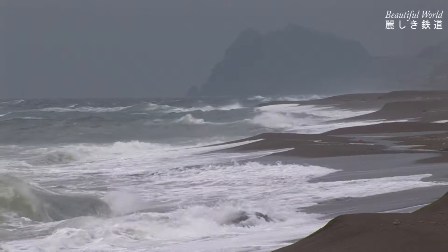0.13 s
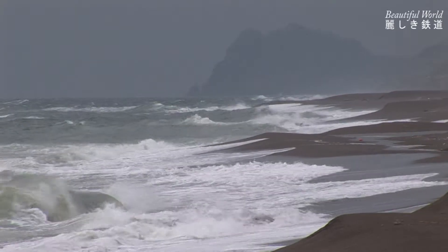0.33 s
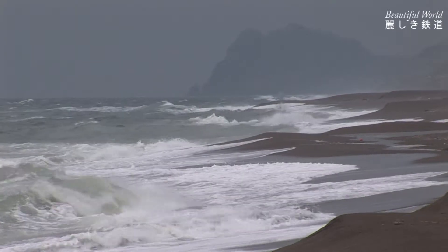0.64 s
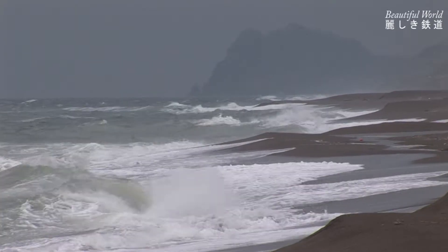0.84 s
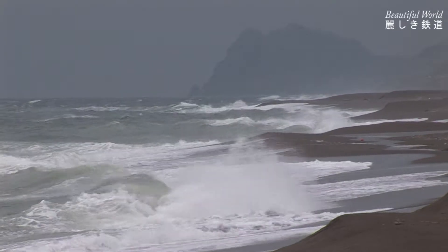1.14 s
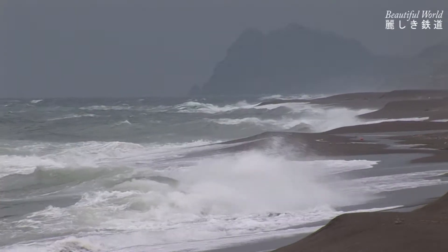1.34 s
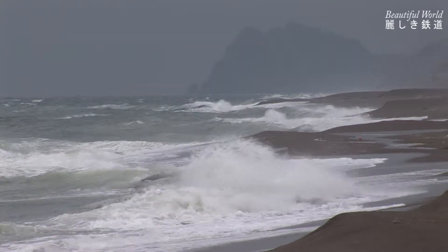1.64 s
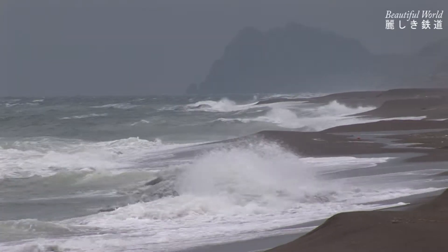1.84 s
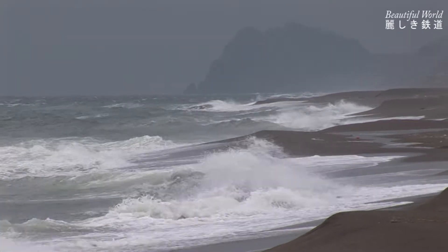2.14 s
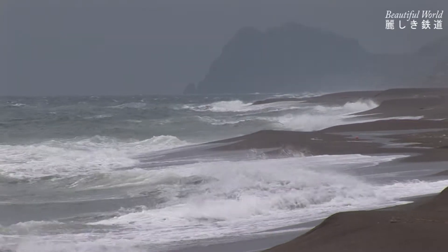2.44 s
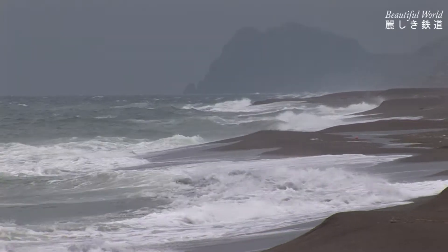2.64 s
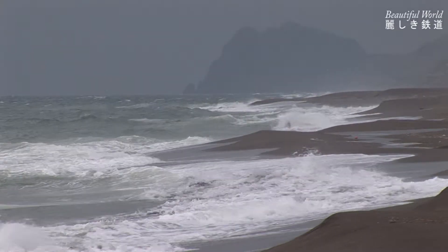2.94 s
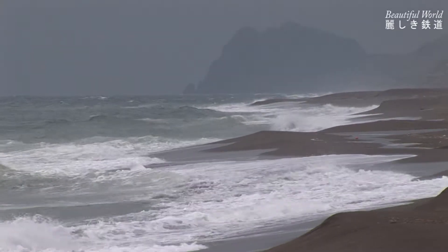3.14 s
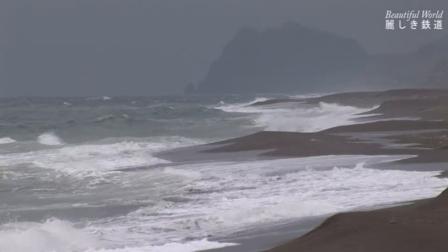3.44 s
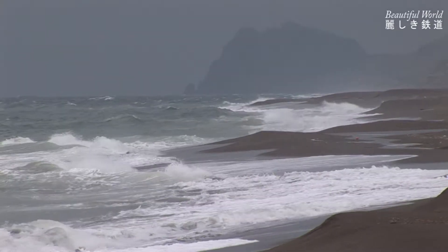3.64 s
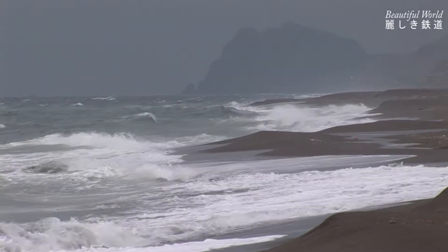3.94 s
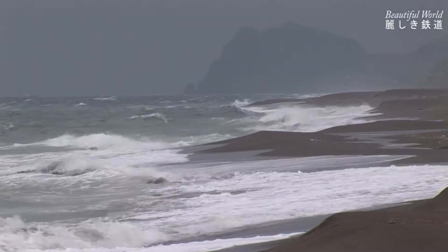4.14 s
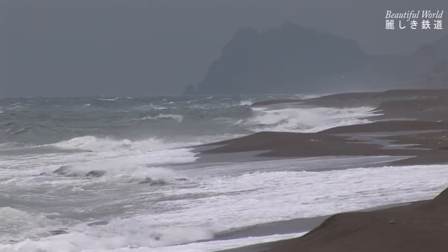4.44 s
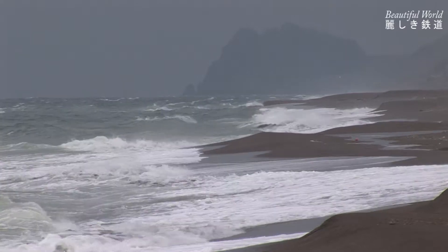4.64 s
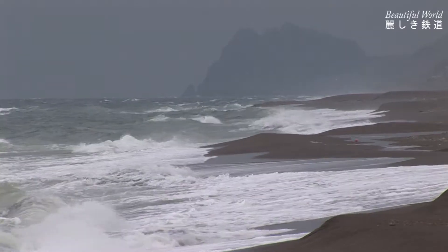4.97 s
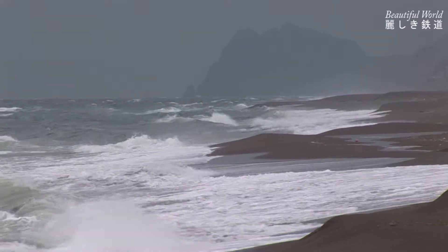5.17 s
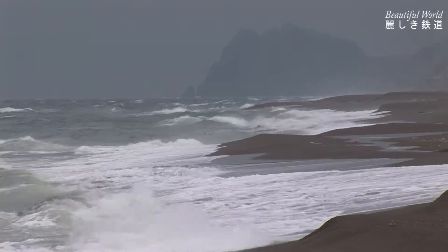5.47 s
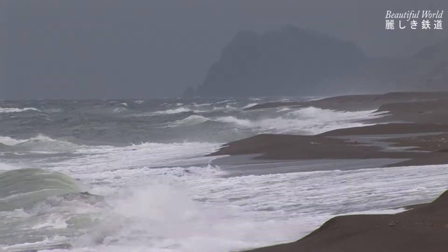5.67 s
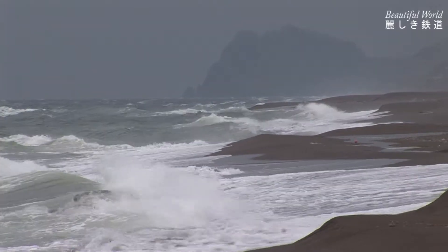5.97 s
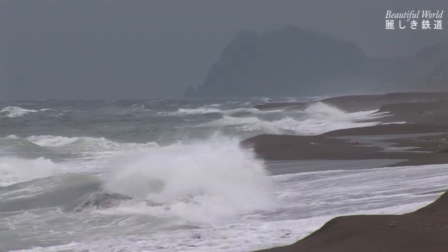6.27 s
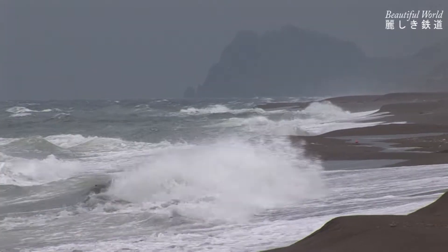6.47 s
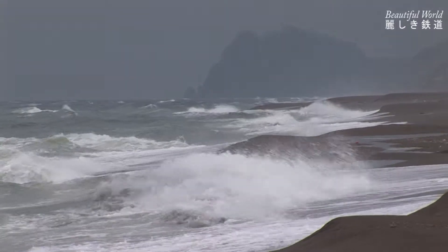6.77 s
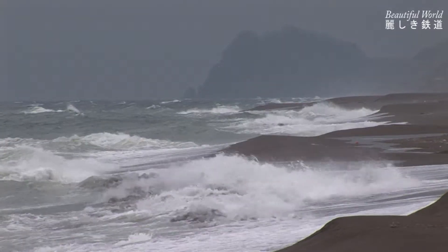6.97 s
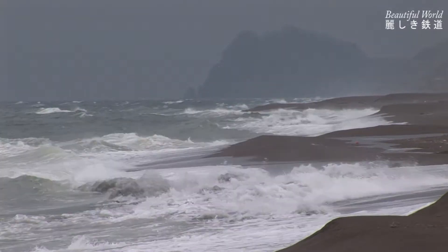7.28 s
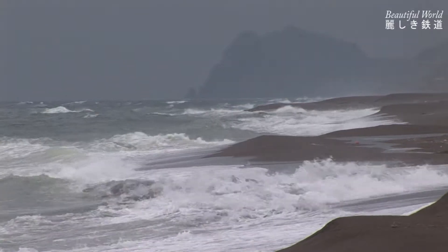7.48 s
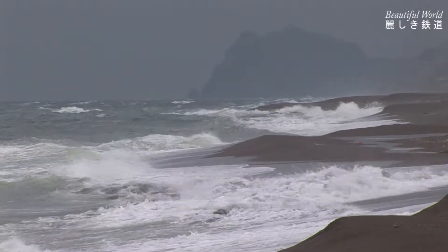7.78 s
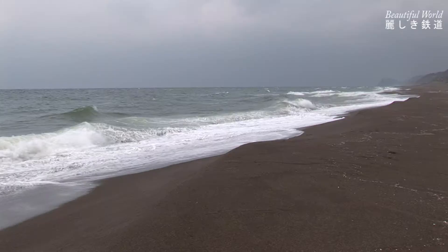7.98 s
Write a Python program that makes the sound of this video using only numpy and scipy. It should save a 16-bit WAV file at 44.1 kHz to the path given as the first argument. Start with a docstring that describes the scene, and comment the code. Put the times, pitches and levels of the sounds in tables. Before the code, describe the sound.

A rough sea on an open sandy beach. A large breaker crests almost at once with a broad roar, low pouring water and hissing spray, then smaller waves follow. Another big one builds and crashes after six seconds, fading slowly. Distant surf never stops. Wind thumps and flutters close on the small stereo microphone, strongest in the first three seconds; bright sea hiss leans left.

```python
"""Breakers of a rough sea plunge on a sandy beach: white water roars, spray and foam hiss, over distant surf.
Water is coloured noise and random clicks under a build-and-fade envelope for each breaker, with splashes
and dips in level. Swash seethes on the sand. Wind buffets, thumps and flutters on the two ports of a small
stereo microphone: lumpy noise and damped swings. It faces the shore with the sea on its left."""
import sys
import numpy as np
from scipy.fft import rfft, irfft, next_fast_len
from scipy.io import wavfile
from scipy.ndimage import uniform_filter1d

SR = 44100
rng = np.random.default_rng(int(sys.argv[2]) if len(sys.argv) > 2 else 0)


def transcribe(u):
    """Save the signal u as a 16-bit wav file named by the first command-line argument.

    u: samples, shape (n,) or (channels, n), limited to [-1, 1]; the rate is SR.
    q: integer samples, one column per channel.
    """
    v = np.clip(np.atleast_2d(u).T, -1, 1)
    q = np.round(v * 32767).astype(np.int16)
    wavfile.write(sys.argv[1], SR, q)


N = 357642
TIME = np.arange(N) / SR
SIZE = next_fast_len(N)
HZ = np.maximum(np.arange(SIZE // 2 + 1) * SR / SIZE, 1)


def from_db(db):
    """Decibels to amplitude gain."""
    return 10 ** (np.asarray(db) / 20)


def rms_one(x):
    """Scale to an rms of 1."""
    return x / np.sqrt(np.mean(x ** 2) + 1e-20)


def in_time(rows):
    """Interpolate each column of a curve at every sample."""
    s, *columns = np.transpose(rows)
    return [np.interp(TIME, s, column) for column in columns]


def in_hz(rows):
    """Interpolate each column of a spectrum over log frequency."""
    hz, *columns = np.transpose(rows)
    return [np.interp(np.log(HZ), np.log(hz), column) for column in columns]


def filtered(x, response):
    """Apply a frequency response."""
    return irfft(rfft(x, SIZE) * response, SIZE)[..., :N]


def drift(rate_hz):
    """Low-passed noise, -6 dB at rate_hz, with an rms of 1."""
    return rms_one(filtered(rng.standard_normal(N), 1 / (1 + (HZ / rate_hz) ** 2)))


def swells(rows):
    """Sum of brief Gaussian level changes, in dB."""
    return sum(db * np.exp(-0.5 * ((TIME - s) / sigma_s) ** 2) for s, sigma_s, db in rows)


def summed(levels_db, envelopes, background_db):
    """Gain of overlapping events over a background level, steady or changing; powers add."""
    event_power = from_db(levels_db) ** 2 @ envelopes ** 2
    return np.sqrt(event_power + from_db(background_db) ** 2)


def bursts(per_s, spread_db):
    """Bubbles and drops: random clicks of very uneven size, in two unrelated streams."""
    sizes = from_db(spread_db * np.minimum(rng.exponential(1, (2, N)), 5))
    present = rng.random((2, N)) < per_s / SR
    return rms_one(rng.standard_normal((2, N)) * sizes * present)


def churn(pair, depth_db, rate_hz):
    """Clouds of bubbles of each size swell and fade independently, octave by octave."""
    octave = np.clip(np.log2(HZ / 250), 0, 6)
    out = np.zeros((2, N))
    for k in range(7):
        band = np.maximum(1 - abs(octave - k), 0)
        out += filtered(pair, band) * from_db(depth_db * drift(rate_hz))
    return out


def at_ports(pair, spectrum, shade_db, lead_rad, coherence):
    """Colour two unrelated signals, mix them into left and right; mid (mean of both) has an rms of 1."""
    colour = from_db(in_hz(spectrum)[0])
    shared, own = rfft(pair, SIZE) * colour
    coherence = np.clip(coherence, 0, 0.99)
    mixed = coherence * shared + np.sqrt(1 - coherence ** 2) * own
    right = from_db(shade_db) * np.exp(-1j * lead_rad) * mixed
    out = irfft(np.array([shared, right]), SIZE)[:, :N]
    return out / np.std(out.mean(axis=0))


# peaks and notches in the sea's tone at each port: centre_hz, width_hz (full, at half the dB), gain_db
LEFT_PORT = [(2520, 430, -3), (4465, 480, -4), (5240, 330, -6.5), (5750, 530, 3), (6930, 1750, -7.5),
             (7000, 890, -7.5), (8700, 500, 1.5), (9150, 500, -2.5)]
RIGHT_PORT = [(2380, 1540, -4.7), (3180, 630, 4.5), (4620, 400, -2.5), (5080, 400, -1), (7100, 2450, -7.5),
              (6960, 910, -9), (9120, 600, -1.5), (13900, 800, 3.5), (14750, 750, -5)]


def port_tone():
    """Peaks and notches in the sea's tone at each port, deepest near 7 kHz."""
    def port_db(port):
        return sum(db / (1 + (2 * (HZ - hz) / width_hz) ** 4) for hz, width_hz, db in port)
    return from_db([port_db(LEFT_PORT), port_db(RIGHT_PORT)])


# sea at the ports, aslant = 1: freq_hz, right_minus_left_db
SEA_SHADE = [(100, -0.5), (300, 1), (500, 5), (800, -5.5), (1300, -8.5), (1800, -2.5), (2450, -4),
             (3100, -4), (4000, -12), (6000, -4.5), (8000, -1.5), (10000, -7.5), (12500, -15),
             (15000, -11.5)]
# freq_hz, left_lead_rad
SEA_LEAD = [(100, .2), (600, 1.0), (900, .8), (1500, -.2), (2900, -.4), (3800, .7), (4500, 1.9),
            (5000, 1.4), (5600, 2.9), (9000, 3.4), (9800, 5.2), (12000, 6.2), (13200, 5.3), (15000, 7.0)]
# freq_hz, coherence (0..1)
SEA_COHERENCE = [(100, .82), (800, .93), (1250, .88), (1800, .94), (2100, .85), (2450, .42), (2800, .72),
                 (3250, .93), (3600, .84), (4000, .68), (4300, .74), (4650, .42), (5000, .8), (6400, .79),
                 (8000, .64), (10500, .72), (12500, .45), (15000, .25)]


def from_sea(pair, spectrum, aslant):
    """Sea sound differs in level and phase at the ports; aslant 0 = straight ahead, 1 = well to the left."""
    shade_db, lead_rad = in_hz(SEA_SHADE)[0], in_hz(SEA_LEAD)[0]
    coherence = in_hz(SEA_COHERENCE)[0] ** aslant
    return filtered(at_ports(pair, spectrum, aslant * shade_db, aslant * lead_rad, coherence), port_tone())


# distant surf: freq_hz, density_db_per_hz (relative)
FAR_SURF = [(30, -2), (70, -12), (160, -10.5), (270, 0), (400, -6), (600, -12), (820, -9), (1030, 0),
            (1300, -5), (2000, -7.5), (3500, -12.5), (5300, -16), (7500, -36), (15000, -46)]
FAR_SURF_DB = -46


def distant_surf():
    """Steady coloured noise: the distant roar."""
    return from_db(FAR_SURF_DB) * from_sea(rng.standard_normal((2, N)), FAR_SURF, aslant=0.58)


# wind at the ports: freq_hz, right_minus_left_db, left_lead_rad, coherence (0..1)
WIND_PORTS = [(40, -2.5, 0.1, 0.96), (148, 0.6, 0.33, 0.82), (340, 2, 1.02, 0.93), (543, -4, 1.6, 0.98),
              (855, -9.5, 0.86, 0.62), (1340, -1, -0.5, 0.94), (2840, 0, -0.7, 1), (4600, 11.5, 1, 0.86),
              (5930, 0, 4, 0.8), (6800, 4, -6, 1), (12000, 1, 9, .6)]


def eddies(spectrum, lump_db, rate_hz, span_s):
    """Lumpy pressure of passing eddies, levelled over span_s."""
    lumpy = rng.standard_normal((2, N)) * from_db(lump_db * drift(rate_hz))
    swirl = at_ports(lumpy, spectrum, *in_hz(WIND_PORTS))
    power = uniform_filter1d(swirl.mean(axis=0) ** 2, int(span_s * SR))
    return swirl / np.sqrt(power + 1e-6)


# hard eddies on the grille: start_s, pitch_hz, swing_db (before damping), rasp_db
THUMPS = [(0.132, 154, -24, -36.5), (0.172, 210, -24, -38), (0.202, 170, -23.5, -46), (0.48, 170, -19, -50),
          (0.556, 169, -25, -31), (0.567, 157, -23, -38), (0.599, 175, -19, -33.5), (0.817, 190, -27, -48),
          (0.924, 183, -28, -47), (1.064, 133, -22, -50), (1.277, 162, -24, -48), (1.457, 205, -25, -52),
          (1.48, 210, -26, -40), (1.514, 175, -25, -32.5), (1.69, 175, -25, -51), (1.731, 70, -31, -40),
          (1.823, 168, -23, -48), (1.878, 180, -28, -37), (2.336, 180, -20.5, -39),
          (2.376, 240, -20.5, -38), (2.426, 167, -24, -36), (2.47, 192, -20, -43), (2.576, 75, -35, -47),
          (2.617, 185, -18, -49), (2.717, 159, -25, -41), (2.767, 158, -18.5, -37.5),
          (2.803, 164, -23, -34), (2.828, 169, -29, -40), (2.858, 192, -22, -40), (2.875, 197, -22, -35),
          (2.969, 155, -26, -48), (3.008, 119, -31, -55), (3.216, 143, -26.5, -52),
          (3.271, 160, -24.5, -37), (3.361, 148, -28, -33), (3.404, 143, -31, -48), (3.667, 140, -28, -51),
          (3.875, 174, -28, -41), (3.929, 140, -25, -41), (4.333, 113, -31, -44), (4.472, 215, -23, -39),
          (4.537, 237, -22, -39), (4.572, 245, -27, -35), (4.596, 170, -23, -43), (4.624, 131, -32, -49),
          (4.981, 149, -32, -38), (5.33, 220, -31, -34.5), (5.356, 126, -27.5, -54.5),
          (5.401, 144, -23, -42), (6.008, 127, -32, -48), (6.143, 260, -25, -43), (6.328, 65, -28, -50),
          (6.341, 156, -26, -45), (6.381, 135, -24.5, -36), (6.521, 181, -28, -41), (6.706, 120, -33, -46),
          (6.936, 183, -30, -40), (7.489, 160, -25, -55), (7.538, 165, -30, -43), (7.558, 142, -28, -40),
          (7.614, 251, -29, -34), (8.051, 60, -24, -50)]
# grille rasp: freq_hz, density_db_per_hz (relative)
RASP = [(200, 2.5), (450, 4), (1100, 3), (1700, -5.5), (2400, -10), (3200, -10.5), (4200, -27), (7000, -33)]
THUMP_DECAY_CYCLES, RASP_PEAK_S = 0.95, 0.0034   # decay to 1/e; time of the rasp's peak


def thumps():
    """Hard eddies: damped pressure swings, each with its own pitch and strength, and a brief grille rasp."""
    age_s = TIME[:SR // 20]
    swing, rasp = np.zeros((2, N))
    signs = rng.choice([-1, 1], len(THUMPS))
    for (s, hz, swing_db, rasp_db), sign in zip(THUMPS, signs):
        first = int(s * SR)
        span = slice(first, first + len(age_s))
        damping = np.exp(-age_s * hz / THUMP_DECAY_CYCLES)
        swing[span] += sign * from_db(swing_db) * np.sin(2 * np.pi * hz * age_s) * damping
        rasp[span] += from_db(rasp_db) * age_s / RASP_PEAK_S * np.exp(1 - age_s / RASP_PEAK_S)
    shade_db, lead_rad, coherence = in_hz(WIND_PORTS)
    right_swing = filtered(swing, from_db(shade_db) * np.exp(-1j * lead_rad))
    push = np.array([swing, right_swing])
    return push + rasp * at_ports(rng.standard_normal((2, N)), RASP, shade_db, lead_rad, coherence)


# gusts: start_s, length_s, buffet_db, rumble_db, flutter_db, left_minus_right_db (on top of WIND_PORTS)
GUSTS = [(0.172, 0.094, -42, -51, -40.5, 2), (0.46, 0.058, -33.5, -41, -45, 2),
         (0.53, 0.18, -35, -50, -45, 1), (0.782, 0.1, -37, -51, -41, 1.5), (0.901, 0.073, -36, -50, -39, 0),
         (1.03, 0.081, -36.5, -46, -51, 0), (1.45, 0.077, -34, -46, -46, 2.5),
         (1.562, 0.09, -38, -52, -45, 1.5), (1.666, 0.092, -33.5, -45, -49, 1.5),
         (1.758, 0.18, -35, -55, -50, 2), (2.33, 0.064, -34, -54, -39, 1.5),
         (2.404, 0.04, -31, -51, -34, -1), (2.446, 0.15, -35, -54, -41.5, 1),
         (2.598, 0.13, -34, -52, -39, 1), (2.741, 0.14, -38, -39, -42, 0), (2.904, 0.097, -40, -60, -47, 2),
         (3.226, 0.21, -41, -42.5, -48.5, 1.5), (3.345, 0.011, -31, -51, -40, -4),
         (3.661, 0.052, -40.5, -43, -46, 7), (3.85, 0.094, -41.5, -42.5, -50.5, 6.5),
         (4.332, 0.077, -43, -42, -46.5, 3), (4.47, 0.032, -37, -56, -49, -1),
         (4.503, 0.19, -44, -50, -50.5, 0.5), (4.533, 0.068, -36.5, -52, -44, 3),
         (4.726, 0.033, -38, -63, -44, 1), (4.972, 0.035, -35, -40, -47, 1),
         (5.074, 0.1, -45.5, -46, -64, 3), (5.32, 0.11, -36, -41, -50, 3), (5.89, 0.15, -45, -47, -64, 4),
         (6.24, 0.059, -41, -42, -52, 6), (6.326, 0.028, -37, -36, -40, 14),
         (6.465, 0.059, -43, -56, -47, 0), (6.922, 0.033, -40, -40, -52, -2),
         (7.423, 0.044, -39.5, -42, -45, 3.5), (7.486, 0.12, -38.5, -44, -44, 3),
         (7.594, 0.03, -39.5, -44, -34, 1), (7.86, 0.072, -45.5, -43, -46, 3),
         (7.951, 0.04, -33.5, -39, -39.5, 1), (8.036, 0.075, -37, -29, -42.5, -5)]
# wind between gusts: time_s, buffet_db, rumble_db
BREEZE = [(0, -43, -47), (0.7, -45, -47), (1.25, -39.5, -53), (1.8, -34.5, -47), (2.9, -44, -46),
          (3.1, -55, -57), (3.8, -47.5, -48.5), (4.1, -56.5, -62), (4.5, -47.5, -50), (5.6, -56, -54),
          (6.2, -45, -49), (6.8, -49, -54), (7.3, -52, -60), (7.8, -63, -54), (8.11, -55, -55.5)]
# wind spectra: freq_hz, density_db_per_hz (relative)
EDDIES = [(20, -28), (50, -22), (100, 1.5), (165, 0.5), (240, -1.5), (340, -6), (450, -14), (700, -18),
          (1200, -22), (4000, -51)]
RUMBLE = [(10, -28), (25, -14), (60, 7.5), (90, 5.5), (150, -13), (400, -66)]
FLUTTER = [(150, -7), (400, 3), (600, 5.5), (1000, 1.5), (1500, -3), (2200, -6), (3000, -8.5), (4000, -34),
           (6000, -49), (7200, -50), (12000, -46)]
BREEZE_SIDE_DB = 2   # left minus right, on top of WIND_PORTS
BREEZE_FLUTTER_DB = -6.5   # re breeze buffeting
GUST_RISE_S, GUST_FALL_S = 0.011, 0.017   # tanh time constants


def wind():
    """Gusts ride on a breeze; eddies push and thump on the ports, tear at the grille and flutter."""
    start_s, length_s, buffet_db, rumble_db, flutter_db, side_db = np.transpose(GUSTS)
    since_s = TIME - start_s[:, None]
    rise = np.tanh(since_s / GUST_RISE_S)
    fall = np.tanh((since_s - length_s[:, None]) / GUST_FALL_S)
    gusts = np.maximum(rise - fall, 0) / 2
    breeze_db, deep_db = in_time(BREEZE)
    swirl = eddies(EDDIES, lump_db=2.0, rate_hz=87, span_s=0.0364)
    deep_swirl = eddies(RUMBLE, lump_db=3.5, rate_hz=19, span_s=0.076)
    buffet = summed(buffet_db, gusts, breeze_db) * swirl
    rumble = summed(rumble_db, gusts, deep_db) * deep_swirl
    # flutter spurts with each eddy
    spurts = (np.tanh(abs(swirl[0])) + 0.76) * from_db(1.8 * drift(rate_hz=81))
    tearing = at_ports(rng.standard_normal((2, N)) * spurts, FLUTTER, *in_hz(WIND_PORTS))
    flutter = summed(flutter_db, gusts, breeze_db + BREEZE_FLUTTER_DB) * tearing
    lean_db = BREEZE_SIDE_DB + (side_db - BREEZE_SIDE_DB) @ gusts
    side_gain = from_db(np.array([lean_db, -lean_db]) / 2)
    return (buffet + rumble + thumps()) * side_gain + flutter


# water running up the sand: peak_s, sigma_s, level_db
SWASHES = [(1.7, 0.56, -53), (3.2, 0.4, -55), (6.95, 0.3, -54), (7.65, 0.3, -49)]
# swash: freq_hz, density_db_per_hz (relative)
SEETHING = [(1200, -26), (2100, -6), (2600, 4), (3000, 0), (3700, -13), (5000, -24), (9000, -45)]


def swash():
    """Small bubbles burst in the sheet of water that runs up the sand."""
    power = sum(from_db(db) ** 2 * np.exp(-((TIME - s) / sigma_s) ** 2) for s, sigma_s, db in SWASHES)
    return np.sqrt(power) * from_sea(bursts(per_s=9000, spread_db=0.5), SEETHING, aslant=0.58)


# breakers: peak_s, build_s, fade_s (before fade_share), water_db, plunge_db, spray_db, foam_db
BREAKERS = [(0.62, 3.4, 1.4, -42.5, -46, -42, -48), (1.62, 0.37, 0.3, -56, -48.5, -46, -53.5),
            (2.04, 0.15, 0.56, -65, -67, -65, -50.5), (2.55, 0.068, 0.31, -54.5, -57, -48, -74),
            (3.08, 0.1, 0.12, -58, -62, -67, -64), (4.62, 0.11, 1.4, -48, -60, -62, -72),
            (5.12, 1.2, 0.6, -54, -68, -50.5, -54), (5.55, 0.13, 0.84, -49.5, -47.5, -62, -58),
            (6.55, 1.36, 4, -43, -43.5, -43, -46.5), (7.25, 0.17, 0.3, -54, -49, -45.5, -62)]
WATER_DB, PLUNGE_DB, SPRAY_DB, FOAM_DB = np.transpose(BREAKERS)[3:]
CREST_S = 0.16   # rounding of the envelope top


def surge(hold_s, fade_share):
    """Envelope per breaker: exponential build, hold and fade, with a rounded top."""
    peak_s, build_s, fade_s = np.transpose(BREAKERS)[:3, :, None]
    before_s = np.maximum(peak_s - TIME, 0)
    after_s = np.maximum(TIME - peak_s - hold_s, 0)
    build = (np.hypot(before_s, CREST_S) - CREST_S) / build_s
    fade = (np.hypot(after_s, CREST_S) - CREST_S) / (fade_s * fade_share)
    return np.exp(-build - fade)


def rolling():
    """Breaker envelopes shared by white water, spray and foam; no hold."""
    return surge(hold_s=0, fade_share=0.68)


# foam: freq_hz, density_db_per_hz (relative)
FOAM = [(1000, -22), (3500, -1), (5000, 1.5), (6200, 3), (7500, 0), (9500, -4), (11000, -0.5), (12500, 2),
        (14000, -0.5), (15200, -6)]
STEADY_FOAM_DB = -60


def foam():
    """Foam bubbles too many to tell apart: churned noise."""
    fizz = churn(rng.standard_normal((2, N)), depth_db=1.23, rate_hz=16)
    return summed(FOAM_DB, rolling(), STEADY_FOAM_DB) * from_sea(fizz, FOAM, aslant=1.02)


# spray: freq_hz, density_db_per_hz (relative)
SPRAY = [(600, -5.5), (1500, 3.5), (2500, 2), (3400, -0.5), (4500, 1.5), (6000, -1), (8000, -19),
         (15000, -36)]
STEADY_SPRAY_DB = -53


def spray():
    """Dense small drops: churned random clicks."""
    drops = churn(bursts(per_s=25000, spread_db=1.5), depth_db=1.5, rate_hz=14)
    return summed(SPRAY_DB, rolling(), STEADY_SPRAY_DB) * from_sea(drops, SPRAY, aslant=0.97)


# white water: freq_hz, density_db_per_hz (relative)
WHITE_WATER = [(200, -19), (600, -15), (1000, 0.5), (1300, 0.5), (1650, 2.5), (2050, -2.5), (2500, -16),
               (3300, -21), (4500, -17.5), (9000, -44)]
STEADY_WATER_DB = -55.5


def white_water():
    """Bubble clouds roar: sparser, more uneven churned clicks."""
    bubbles = churn(bursts(per_s=6000, spread_db=2.5), depth_db=2.0, rate_hz=26)
    return summed(WATER_DB, rolling(), STEADY_WATER_DB) * from_sea(bubbles, WHITE_WATER, aslant=0.91)


# falling water: freq_hz, density_db_per_hz (relative)
FALLING_WATER = [(40, -6), (130, 4), (300, 2), (500, 0.5), (800, 2.5), (1100, -7), (1600, -38), (4000, -38)]


def plunge():
    """Falling water pours on after the crest, then fades faster than the white water."""
    gain = summed(PLUNGE_DB, surge(hold_s=0.97, fade_share=0.13), -np.inf)
    return gain * from_sea(bursts(per_s=4000, spread_db=2.0), FALLING_WATER, aslant=0.65)


# water tumbling inside a breaker: peak_s, sigma_s, rise_db
SPLASHES = [(0.69, 0.03, 2), (2.42, 0.02, 3), (2.655, 0.025, 2.5), (4.84, .025, 2), (5.11, 0.017, 3.5),
            (5.51, 0.027, 2.5), (5.87, .035, 3), (6.115, .025, 3), (6.295, .025, 2.5), (6.365, 0.022, 1),
            (6.5, 0.036, 4.5), (6.685, .015, 2.5), (7.06, 0.098, 0)]
# brief dips in surf level: centre_s, sigma_s, depth_db
DIPS = [(3.17, .025, 2), (4.432, 0.016, 4), (5.235, 0.035, 2), (5.71, 0.04, 2.5), (6.196, 0.016, 2.5),
        (6.418, 0.018, 2.5), (7.545, 0.04, 5.5), (7.897, 0.013, 6.5)]


def sea():
    """Breakers over distant surf; tumbling masses of water splash, the surf level dips briefly."""
    splashing = (white_water() + spray()) * from_db(swells(SPLASHES))
    # small random waver shared by all the breaker layers
    waver = from_db(0.54 * drift(rate_hz=45))
    near = (foam() + plunge() + swash() + splashing) * waver
    return (distant_surf() + near) * from_db(-swells(DIPS))


def scene():
    """The sea with the wind on top."""
    return sea() + wind()


CUTOFF_HZ = 15080   # -3 dB


def record(dry):
    """Steep low-pass."""
    return filtered(dry, 1 / np.sqrt(1 + (HZ / CUTOFF_HZ) ** 400))


dry = scene()
out = record(dry)
transcribe(out)
```